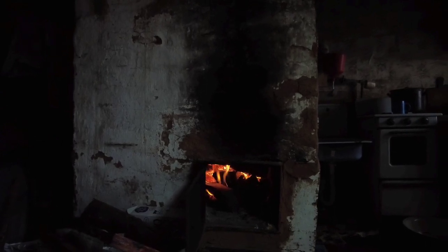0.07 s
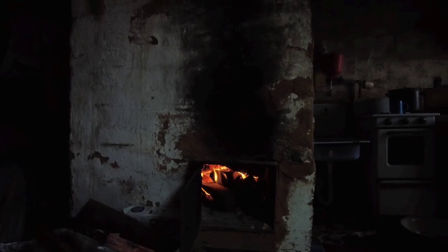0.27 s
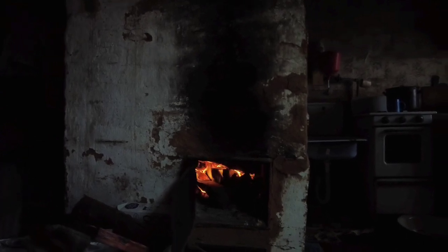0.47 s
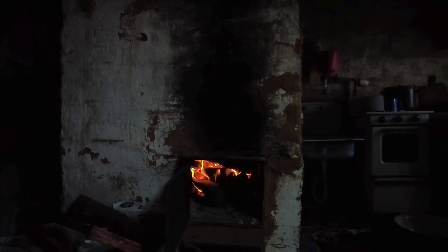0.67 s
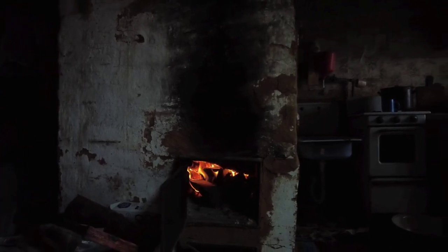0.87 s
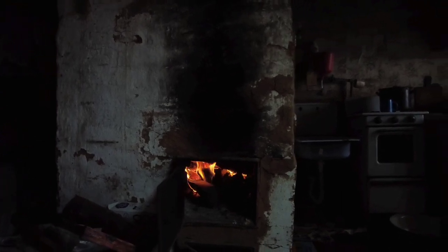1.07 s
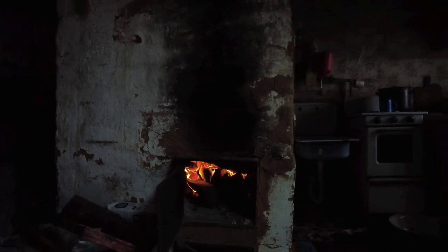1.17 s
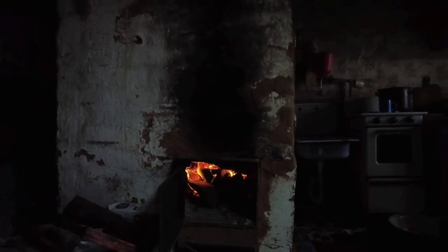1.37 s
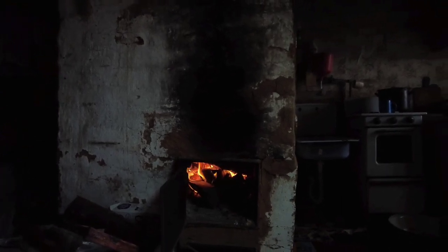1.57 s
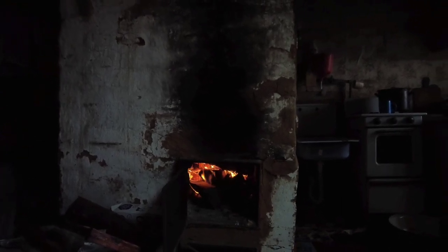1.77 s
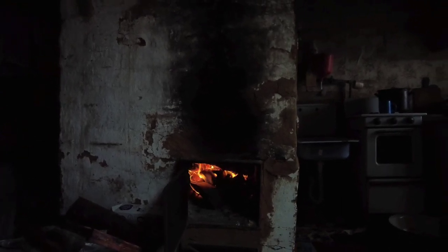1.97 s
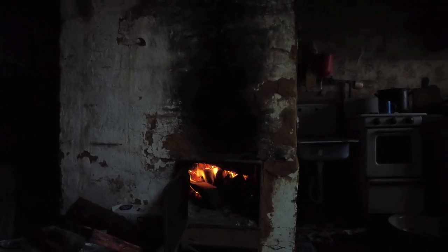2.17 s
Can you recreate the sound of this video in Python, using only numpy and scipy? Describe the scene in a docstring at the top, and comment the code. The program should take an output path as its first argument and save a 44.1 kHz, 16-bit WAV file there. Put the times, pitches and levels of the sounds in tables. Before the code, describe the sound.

Stove fire with soft low flutter, fine crackling ticks, a dull log bump and a late pop.

```python
"""Logs burn in the open firebox of a brick stove in a quiet kitchen: the draught is rumbling noise
and the flames flutter as short wandering tones. Embers tick as tiny rings and snaps, one log pops in
a run of breaks that ring its modes, and noise tails and a reverb throw ticks and pop back.
A log settles with a soft bump, and something dry rustles as swells of noise, mostly in the first second.
Behind it lie a deep hum of wavering tones and an even hiss."""
import sys
import numpy as np
from scipy import signal
from scipy.fft import rfft, irfft
from scipy.io import wavfile
from scipy.ndimage import uniform_filter1d

SR = 44100
rng = np.random.default_rng(int(sys.argv[2]) if len(sys.argv) > 2 else 0)


def file_out(sig):
    """Save sig as 16-bit WAV at sys.argv[1]."""
    # one column per channel
    cols = np.atleast_2d(sig).T
    # limit, then scale
    lim = np.clip(cols, -1, 1)
    pcm = np.round(lim * 32767).astype(np.int16)
    wavfile.write(sys.argv[1], SR, pcm)


N = 97461  # length in samples

# left-right likeness of draught and hiss: pitch_hz, likeness (-1 opposite .. 1 same)
BACKGROUND_LIKENESS = [(30, 1), (90, 0.87), (140, 0.95), (210, 0.82), (330, 0.83), (500, 0.79),
                       (770, -0.47), (1170, -0.16), (1800, 0.052), (2800, 0.36), (4200, 0.056),
                       (6400, 0.59), (9800, 0.24), (15000, 0.54)]
# left-right likeness of rustles and bump: pitch_hz, likeness (-1 opposite .. 1 same)
RUSTLE_LIKENESS = [(250, 0.59), (450, 0.8), (740, 0.039), (1150, 0.071), (1400, 0.58), (1600, 0.8),
                   (2000, 0.71), (3300, 0.53), (6000, 0.64)]


def amp(db):
    """Decibels to gain."""
    return 10 ** (np.asarray(db) / 20)


def evened(x):
    """Scales to rms 1."""
    return x / np.sqrt(np.mean(x ** 2) + 1e-20)


def read(points, hz):
    """Reads a table on a log-frequency axis."""
    f, value = np.transpose(points)
    return np.interp(np.log(hz + 1), np.log(f + 1), value)


def add(mix, start_s, sound):
    """Adds a sound into the mix at its start time, cut off at the end of the mix."""
    part = mix[..., max(round(start_s * SR), 0):][..., :sound.shape[-1]]
    part += sound[..., :part.shape[-1]]


def drift(rate_hz):
    """Random wandering of rms 1: white noise under a Gaussian low-pass, down to 1/e at the rate."""
    hz = np.fft.rfftfreq(N, 1 / SR)
    lowpass = np.exp(-(hz / rate_hz) ** 2) * (hz > 0)
    return evened(irfft(rfft(rng.standard_normal(N)) * lowpass, N))


def noise(spectrum, likeness, patchy_db, tilt_db=0, size=1024):
    """Stereo noise of rms 1 with a spectrum, a left-right likeness and drifting patches of level."""
    # left-right balance: pitch_hz, left_minus_right_db
    balance = [(100, 0.5), (380, 1), (680, 1), (1400, 0.7), (2600, 0), (5000, 0), (8100, 0), (15000, 4.5)]
    hop = size // 4
    hz = np.fft.rfftfreq(size, 1 / SR)
    a, b, c, d, patches = rng.standard_normal((N // hop + 6, len(hz), 5)).T
    # smooth the patches over pitch, then over time
    patches = uniform_filter1d(patches, size=7, axis=0)
    patches = evened(uniform_filter1d(patches, size=4, axis=1))
    like = np.clip(read(likeness, hz), -1, 1)[:, None]
    left, other = a + 1j * b, c + 1j * d
    right = like * left + np.sqrt(1 - like ** 2) * other
    lean = amp(read(balance, hz) / 2)[:, None]
    z = np.array([left * lean, right / lean])
    colour_db = read(spectrum, hz) + tilt_db * np.log2(hz + 1)  # tilt in dB per octave
    z *= amp(colour_db[:, None] + patchy_db * patches)
    return evened(signal.istft(z, nperseg=size, noverlap=size - hop)[1][:, :N])


def kitchen(x):
    """Kitchen reverb: sparse random echoes for each ear, the treble dying sooner than the mids."""
    # reverb times: pitch_hz, t60_s
    decay_times = [(300, 0.26), (1500, 0.33), (6000, 0.14), (14000, 0.15)]
    first_echo_s = 0.0017
    shape = (2, SR // 2)
    taps = rng.standard_normal(shape) * (rng.random(shape) < .2)
    taps *= np.arange(SR // 2) > first_echo_s * SR
    hz, t, z = signal.stft(taps, SR, nperseg=256)
    decay = amp(-60 * t / read(decay_times, hz)[:, None])
    tail = signal.istft(z * decay, SR, nperseg=256)[1]
    tail = tail / np.linalg.norm(tail, axis=1, keepdims=True)
    return signal.fftconvolve(x[None], tail, axes=1)[:, :N]


def dying(t, t60_s):
    """Exponential decay by 60 dB over t60."""
    return np.exp(-np.log(1000) * t / t60_s)


def ring(t, hz, t60_s):
    """One dying mode: a decaying sine."""
    return np.sin(2 * np.pi * hz * t) * dying(t, t60_s)


def hum():
    """Deep steady tones, likely a fridge motor, whose levels waver a little."""
    # tones of the hum: pitch_hz, level_db
    hum_tones = [(24.3, -43.5), (72.6, -61), (100, -56), (318.5, -79.5)]
    waver = 0.18  # rms share of the level
    t, out = np.arange(N) / SR, np.zeros(N)
    for hz, db in hum_tones:
        tone = np.sin(2 * np.pi * (hz * t + rng.random()))
        out += amp(db) * evened((1 + waver * drift(rate_hz=2.17)) * tone)
    return out


def hiss():
    """Even background hiss: quiet, lightly patchy noise, strongest above 1 kHz."""
    # colour of the hiss: pitch_hz, relative_level_db_per_hz
    hiss_colour = [(300, -18), (1000, -11.5), (1350, 8.5), (1550, 4.5), (1800, 8.5), (2100, 1.5), (3900, 1),
                   (4600, 3.5), (6200, 1.7), (7200, -1.7), (9000, -1.5), (9700, 0.3), (11000, -3),
                   (13500, -0.2), (15300, 0.13)]
    return amp(-64.5) * noise(hiss_colour, BACKGROUND_LIKENESS, patchy_db=1.4)


def rustles():
    """Something dry slides: grainy noise swells and dies away under lopsided Gaussian shapes."""
    # each rustle: peak_s, rise_s and fall_s (Gaussian sigmas), level_db, tilt_db_per_octave
    swells = [(.01, 0.089, 0.12, -57, -1.5), (.21, 0.057, 0.06, -59.5, 0), (.36, 0.079, 0.056, -56.3, -0.3),
              (0.436, 0.053, 0.075, -56.5, -1), (.58, 0.14, 0.069, -67, 1),
              (0.769, 0.0053, 0.021, -60, 3.5), (0.87, 0.022, 0.019, -58, 2), (.92, 0.041, .03, -65, 1),
              (1.648, 0.011, 0.046, -66.5, 0)]
    # colour of the rustles before tilt: pitch_hz, relative_level_db_per_hz
    rustle_colour = [(120, -25), (260, 1.5), (420, 4.5), (520, 1.5), (600, 5.5), (740, -3.5), (820, 1),
                     (895, 5.5), (1010, 0.5), (1120, -0.5), (1400, 3), (1950, -2.5), (2300, -3),
                     (2530, 0.1), (2950, -5), (3270, -1.5), (3800, -10.5), (4400, -7), (5000, -14.5),
                     (8000, -18), (15000, -27)]
    grain_db, patchy_db = 1.6, 1.37
    t, out = np.arange(N) / SR, np.zeros((2, N))
    for peak_s, rise_s, fall_s, db, tilt_db in swells:
        shape = np.exp(-((t - peak_s) / np.where(t < peak_s, rise_s, fall_s)) ** 2 / 2)
        grain = amp(db + grain_db * drift(rate_hz=125))
        out += shape * grain * noise(rustle_colour, RUSTLE_LIKENESS, patchy_db, tilt_db)
    return out


def bump():
    """A log settles into the ash in two soft steps, each a dull burst of dying noise."""
    # steps of the settling: start_s, level_db
    steps = [(0.861, -49), (0.888, -49)]
    # colour of the bump: pitch_hz, relative_level_db_per_hz
    bump_colour = [(120, -14), (240, -6), (380, 5), (480, -2), (700, -5), (950, -10), (1400, -13),
                   (2100, -21), (3200, -19), (5000, -20), (7000, -37), (12000, -45)]
    rise_s, t60_s = 0.0032, 0.12
    out = np.zeros((2, N))
    for start_s, db in steps:
        since = np.maximum(np.arange(N) / SR - start_s, 0)
        shape = (1 - np.exp(-since / rise_s)) * dying(since, t60_s)
        out += amp(db) * shape * noise(bump_colour, RUSTLE_LIKENESS, patchy_db=6.5)
    return out


def tick(db, hz, t60_s):
    """The ring of a flake of charcoal, and a tiny snap that the firebox scatters differently to each ear."""
    snap_level, snap_s = 0.79, 0.0016  # level against the ring, decay to 1/e
    t = np.arange(SR // 20) / SR
    grit = np.diff(rng.standard_normal((2, len(t))), prepend=0) / 2  # differencing brightens it
    snap = grit * np.exp(-t / snap_s)
    return amp(db) * (ring(t, hz, t60_s) + snap_level * snap)


def embers():
    """Clear ticks among a random scatter of faint ones, all with kitchen reverb."""
    # clear ticks: start_s, level_db, pitch_hz, t60_s
    clear_ticks = [(0.1358, -42, 13400, 0.0016), (.1849, -49.5, 13000, 0.0022),
                   (0.5053, -48.5, 12300, 0.0014), (.5082, -50.5, 9500, .0014), (.5114, -51, 14800, .0014),
                   (.5131, -54, 13000, .0014), (.5848, -54, 15000, .006), (0.5852, -59, 10900, .014),
                   (.754, -50, 15000, .003), (.778, -41, 12000, 0.00064), (0.803, -48, 14500, .002),
                   (1.1118, -50, 10500, 0.0024), (1.2984, -45.5, 13700, .002), (1.3405, -57, 10450, .007),
                   (1.6499, -51.5, 9350, 0.01), (1.6508, -45, 7800, 0.0034), (1.6533, -49, 8300, 0.0018),
                   (1.657, -64, 8800, .05), (1.819, -51, 5200, 0.0029), (2.0947, -47, 13400, .002)]
    faint_per_s, faint_db, faint_spread_db, faint_hz, faint_t60_s = 34, -61.5, 2.5, 8440, 0.0034
    room_db = -6
    out = np.zeros((2, N))
    for start_s, db, hz, t60_s in clear_ticks:
        add(out, start_s, tick(db, hz, t60_s))
    # the scatter runs on past the end, where it is cut off
    draws = rng.random((150, 3))
    for when, size, pitch in draws:
        db = faint_db - faint_spread_db * np.log(size + .06)  # a few stand out
        hz = faint_hz * 2 ** (1.6 * (pitch - .5))  # up to 0.8 octave either way
        add(out, when * len(draws) / faint_per_s, tick(db, hz, faint_t60_s))
    return out + amp(room_db) * kitchen(out.mean(0))


def pop():
    """A pocket of steam splits the wood; every break rings the log, and firebox and kitchen answer."""
    # quick run of fibre breaks: start_s, level_db
    breaks = [(1.9265, -21), (1.92723, -24), (1.9284, -31), (1.9297, -32)]
    # modes of the log: pitch_hz, relative_level_db, t60_s
    log_modes = [(437, -23, 0.015), (905, -25, 0.021), (1260, -23, 0.013), (1800, -29, 0.0035),
                 (3700, -16.5, 0.0064), (4280, -24, 0.0057), (5120, -6, 0.0064), (5920, 0.5, 0.0038),
                 (7420, -23, .006), (12700, -24, 0.0032)]
    # colour of the quick firebox boom: pitch_hz, relative_level_db_per_hz
    boom_colour = [(150, -5), (420, -2), (780, -4), (1300, -9), (1800, -25), (2800, -28), (4000, -5),
                   (6000, -14), (7200, -13), (10000, -21), (15000, -45)]
    # colour of the kitchen wash: pitch_hz, relative_level_db_per_hz
    wash_colour = [(250, -14), (500, 7), (720, -5), (890, 5), (1060, -1), (1350, 4.5), (2100, -6.5),
                   (3000, -3), (3450, -3), (3900, -6), (4400, 0.5), (5000, 3.5), (5400, 0), (6100, 1),
                   (6900, -15), (10000, -17), (15000, -30)]
    # left-right likeness of both echoes: pitch_hz, likeness (-1 opposite .. 1 same)
    echo_likeness = [(300, 0.32), (800, -0.12), (1500, 0.25), (3000, 0.067), (6000, 0.23)]
    rise_s, echo_rise_s = 0.00038, 0.00096
    pan_db = 1.2  # left up and right down by this much
    boom_db, boom_t60_s, wash_db, wash_t60_s = -41.5, 0.029, -51.5, 0.27

    t, out = np.arange(SR // 5) / SR, np.zeros(N)
    modes = sum(amp(db) * ring(t, hz, t60_s) for hz, db, t60_s in log_modes)
    log = (1 - np.exp(-(t / rise_s) ** 2)) * modes
    for start_s, db in breaks:
        add(out, start_s, amp(db) * log)

    # both echoes set in at the first break
    since = np.maximum(np.arange(N) / SR - breaks[0][0], 0)
    boom = amp(boom_db) * dying(since, boom_t60_s) * noise(boom_colour, echo_likeness, patchy_db=3.0)
    wash = amp(wash_db) * dying(since, wash_t60_s) * noise(wash_colour, echo_likeness, patchy_db=3.0)
    echoes = (1 - np.exp(-since / echo_rise_s)) * (boom + wash)
    return out * amp([[pan_db], [-pan_db]]) + echoes


def flames():
    """The draught rumbles; each puff of flame briefly sounds a resonance of the firebox."""
    # colour of the draught: pitch_hz, relative_level_db_per_hz
    draught_colour = [(4, -25), (13, 0), (24, -1), (33, -7.5), (50, 0), (68, 1.5), (85, -13), (125, -12),
                      (152, -7.5), (182, -19), (215, -13), (280, -26), (410, -23.5), (520, -30), (680, -30),
                      (1000, -37), (2500, -54)]
    # flame puffs: middle_s, length_s (between the 1/e points), pitch_hz, level_db
    puffs = [(.01, 0.038, 175, -49.5), (0.014, 0.022, 438, -52.5), (0.053, 0.022, 240, -58),
             (0.1, 0.081, 70, -49), (0.132, 0.027, 400, -55), (0.264, 0.037, 555.5, -61.5),
             (0.215, 0.053, 245, -56), (0.319, 0.053, 218, -51), (0.335, 0.032, 69.85, -41.5),
             (0.398, 0.062, 69.76, -41.5), (0.442, 0.07, 208.5, -58), (0.498, 0.048, 68, -44.5),
             (0.563, 0.03, 150, -58), (0.598, 0.031, 64, -45), (0.727, .04, 70, -46),
             (0.847, 0.12, 156.8, -49), (0.861, 0.061, 228, -55.5), (0.871, 0.086, 72, -41.5),
             (0.892, 0.051, 190, -53.5), (0.943, 0.038, 155, -52), (1.081, .04, 70, -52),
             (1.134, 0.093, 160, -59), (1.214, 0.057, 72, -45.5), (1.319, 0.062, 157.2, -49),
             (1.332, 0.089, 73.1, -44.5), (1.534, 0.035, 209.6, -53.5), (1.782, 0.061, 158.6, -47.5),
             (1.783, 0.046, 72.8, -42), (1.887, 0.04, 62, -48.5), (1.962, 0.032, 68, -40.5),
             (2.12, 0.027, 55.1, -41), (2.175, 0.033, 55.4, -39.5)]
    draught_db, patchy_db, swell_db = -49.5, 2, 0.88
    wander, wander_hz = 0.1021, 45.1  # rms share of the pitch, rate of its wandering
    t = np.arange(N) / SR
    swell = amp(draught_db + swell_db * drift(rate_hz=10.4))
    out = swell * noise(draught_colour, BACKGROUND_LIKENESS, patchy_db, size=4096)
    for middle_s, length_s, hz, db in puffs:
        turns = np.cumsum(hz * (1 + wander * drift(wander_hz))) / SR + rng.random()
        shape = np.exp(-(2 * (t - middle_s) / length_s) ** 2)
        out = out + amp(db) * shape * evened(np.sin(2 * np.pi * turns))
    return out


def scene():
    """The fire over the hum and hiss of the kitchen."""
    return hum() + hiss() + rustles() + bump() + embers() + pop() + flames()


def record(dry):
    """Limits the band with a steep low-pass at the top of the treble."""
    edge_hz = 15700
    lowpass = signal.firwin(511, edge_hz, window=("kaiser", 9), fs=SR)
    return signal.oaconvolve(dry, lowpass[None], "same")


dry = scene()
out = record(dry)
file_out(out)
```